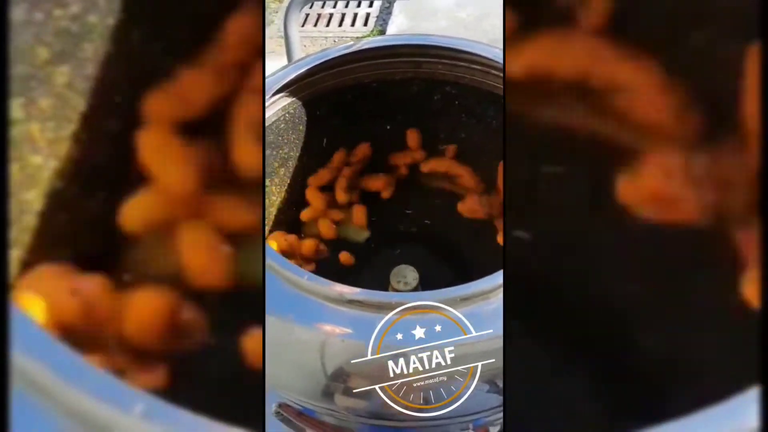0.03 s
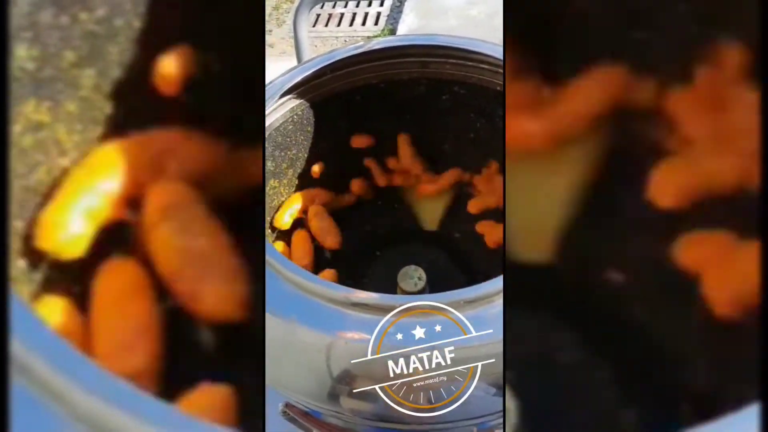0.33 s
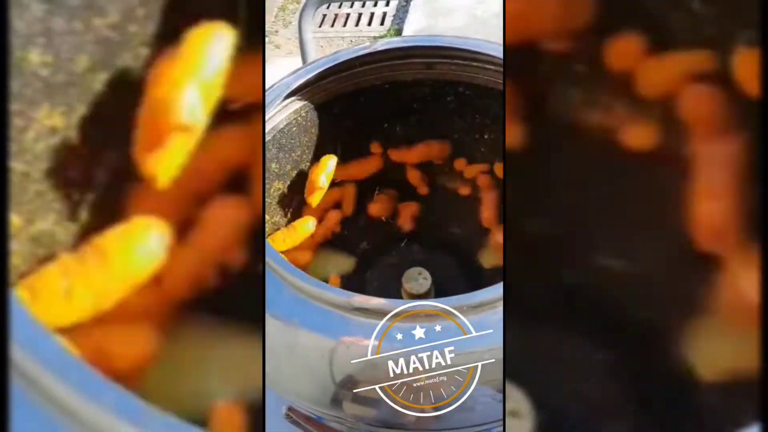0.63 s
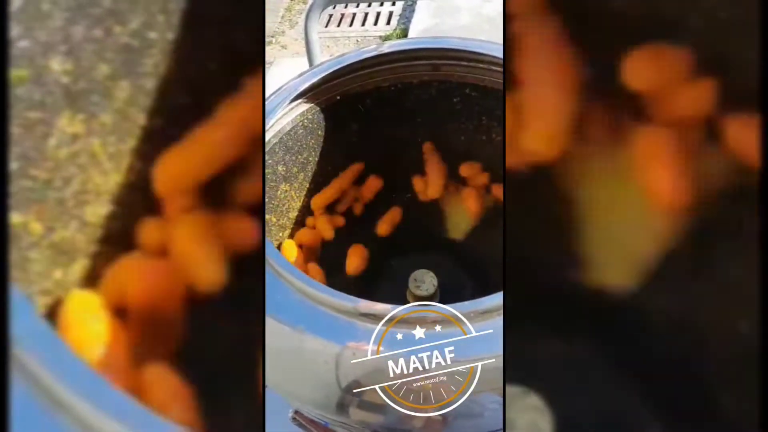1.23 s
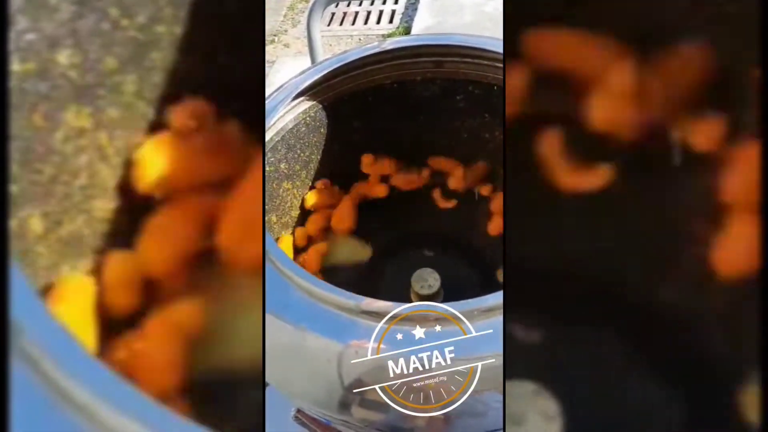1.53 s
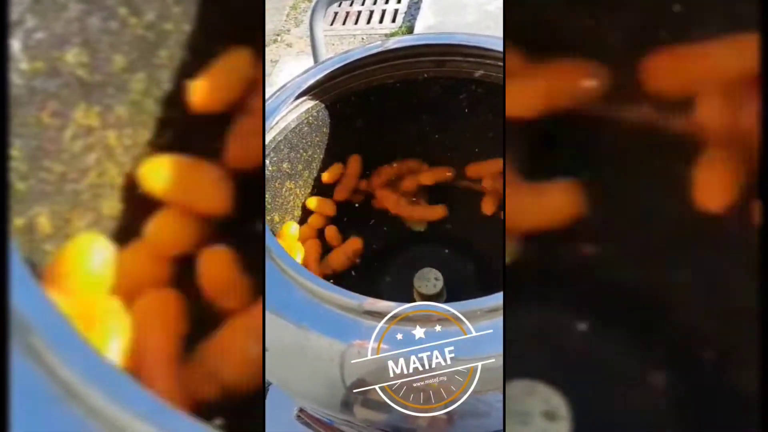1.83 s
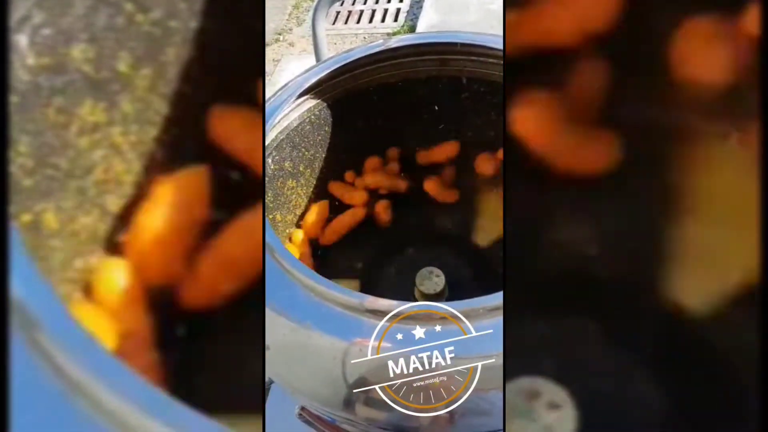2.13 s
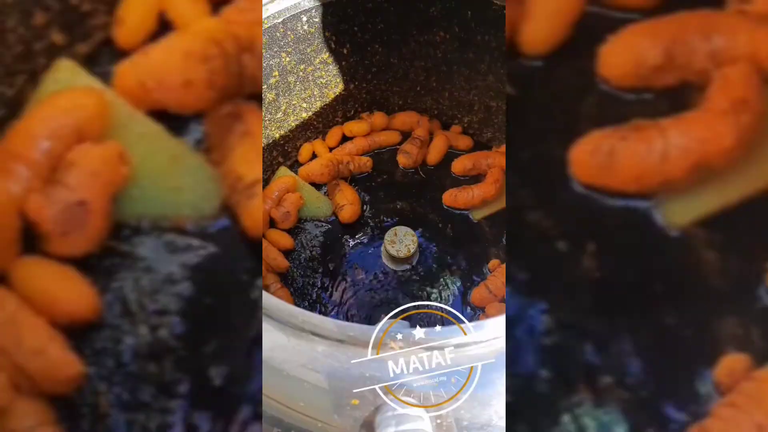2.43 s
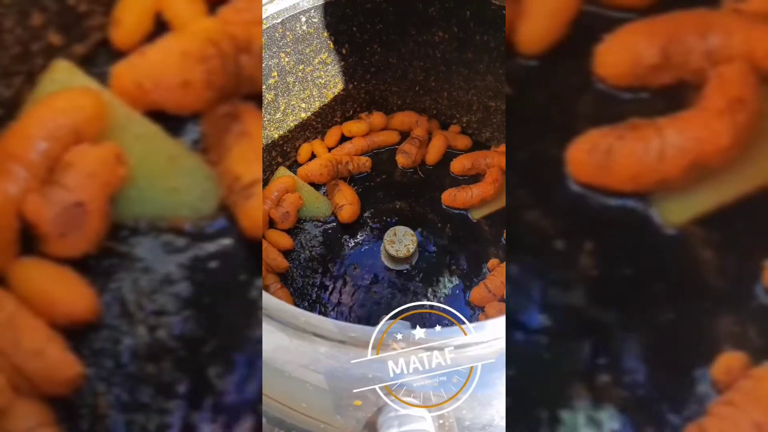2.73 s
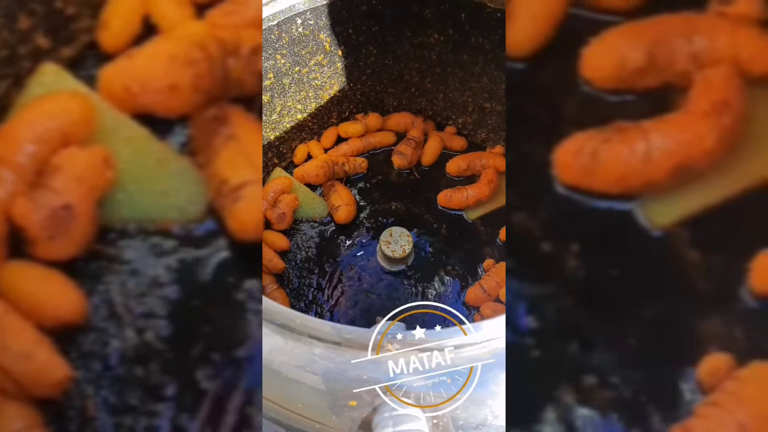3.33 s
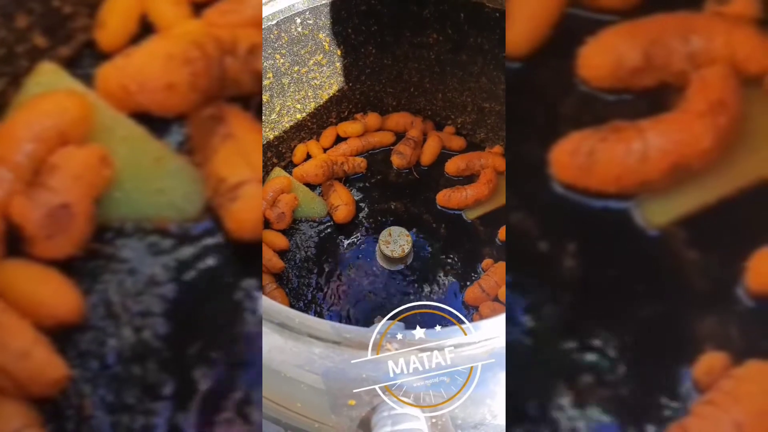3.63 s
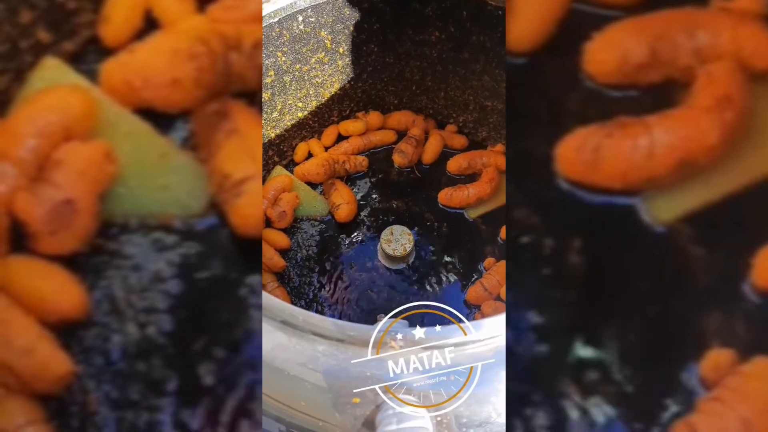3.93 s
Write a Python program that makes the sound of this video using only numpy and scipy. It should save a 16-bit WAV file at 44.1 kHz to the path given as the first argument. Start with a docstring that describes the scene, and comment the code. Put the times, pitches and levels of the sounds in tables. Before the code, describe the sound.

Throbbing rumble of roots thumping in a steel drum cuts off; water drips faintly.

```python
"""A low, throbbing din of thumps, hollow knocks and wet rasping: roots tumble in an abrasive peeler. The ribs
of its motor-driven disc heave the load, and the impacts excite the steel drum's resonant modes. The roots also
knock against each other and scrape on the grit lining, with reflections inside the drum. The scene changes
abruptly, with a click. The drum rings out, water ticks and drips as ringing bubbles, and one root settles, over
a low outdoor rumble and a faint hiss."""
import sys
import numpy as np
from scipy import signal
from scipy.fft import rfft, irfft
from scipy.io import wavfile
from scipy.ndimage import uniform_filter1d

SR = 44100
rng = np.random.default_rng(int(sys.argv[2]) if len(sys.argv) > 2 else 0)


def int16_out(signal):
    """Quantize to a 16-bit WAV file."""
    q = np.round(np.clip(np.atleast_2d(signal).T, -1, 1) * 32767)
    wavfile.write(sys.argv[1], SR, q.astype(np.int16))


N = 176400
STOP_S, CUTOFF_HZ = 2.466, 15850
THROB_BELOW_HZ, KNOCK_ABOVE_HZ = 250, 500   # the drum's modes between these carry the thumps
CENTRED = [(1, 0)]   # equal balance at all frequencies


def from_db(db):
    """Amplitude ratio of a level in decibels."""
    return 10 ** (np.asarray(db) / 20)


def unit_rms(x):
    """Normalisation to unit mean power."""
    return x / np.sqrt(np.mean(x ** 2) + 1e-20)


def times():
    """Sample times in seconds."""
    return np.arange(N) / SR


def white():
    """Two uncorrelated white noises."""
    return rng.standard_normal((2, N))


def level(rows):
    """Gain along a curve that is linear in decibels."""
    return from_db(np.interp(times(), *np.transpose(rows)))


def at_hz(points, hz):
    """Interpolation on a log-frequency axis."""
    known_hz, values = np.transpose(points)
    return np.interp(np.log(hz), np.log(known_hz), values)


def pan(balance_db):
    """Level difference between channels: balance is left minus right."""
    return from_db(np.array([[balance_db], [-balance_db]]) / 2)


def resonate(x, hz, width_hz):
    """A damped oscillator as a two-pole filter."""
    r = np.exp(-np.pi * width_hz / SR)
    return signal.lfilter([1, 0, -1], [1, -2 * r * np.cos(2 * np.pi * hz / SR), r * r], x + 1e-18)


def burst(start_s, decay_s):
    """Exponential decay from a sudden onset."""
    age = times() - start_s
    return (age >= 0) * np.exp(-np.maximum(age, 0) / decay_s)


def swells(events, rise_s, fall_s, bed_db, lead_s=0):
    """Incoherent addition: events rise and fall, their powers summed on a steady bed."""
    t, power = times(), from_db(bed_db) ** 2
    for peak_s, db in events:
        age = t - peak_s + lead_s
        falloff = np.minimum(np.maximum(-age / rise_s, age / fall_s), 20)
        power = power + from_db(db) ** 2 * np.exp(-2 * falloff)
    return np.sqrt(power)


def contacts(per_s, spread_db=0):
    """A Poisson process of impulses, equal in size unless given a spread."""
    sizes = from_db(spread_db * np.minimum(rng.exponential(1, N), 4))
    return sizes * (rng.random(N) < per_s / SR)


def patter(per_s, spread_db, decay_s, bed):
    """Shot-noise envelope: the energies of decaying contacts add on a steady bed."""
    energy = contacts(per_s, spread_db) ** 2 + 1e-18
    power = signal.lfilter([1], [1, -np.exp(-2 / (decay_s * SR))], energy)
    return unit_rms(np.sqrt(power / power.mean() + bed ** 2))


# Level difference between the microphones: frequency_hz, balance_db
MIC_BALANCE = [(110, -0.5), (380, 28.5), (650, -1), (950, 6.5), (2400, 1), (4400, 2), (8300, 2.5),
               (10500, 11.5), (15000, 9)]
# Likeness of their signals: frequency_hz, correlation
MIC_CORRELATION = [(100, 0.98), (400, 0.63), (900, 0.49), (1600, 0.033), (3000, -0.07), (8000, -0.065)]
def coloured(pair, spectrum, balance=MIC_BALANCE):
    """Spectral shaping, with mid-side mixing to set the stereo correlation; unit rms."""
    hz = np.maximum(np.fft.rfftfreq(N, 1 / SR), 1)
    correlation = np.clip(at_hz(MIC_CORRELATION, hz), -1, 1)
    mid, side = rfft(pair)
    signs = np.array([[1], [-1]])
    stereo = np.sqrt(1 + correlation) * mid + signs * np.sqrt(1 - correlation) * side
    gain = from_db(at_hz(spectrum, hz) + signs * at_hz(balance, hz) / 2)
    return unit_rms(irfft(stereo * gain * (hz < CUTOFF_HZ), N))


# Spectra of the outdoor rumble and the hiss: frequency_hz, relative_db
RUMBLE_SPECTRUM = [(25, -26), (48, -10.5), (86, 0), (115, -7), (168, -6.5), (193, -21), (285, -13.5),
                   (400, -20), (1140, -29.5), (3300, -39), (9500, -47)]
HISS_SPECTRUM = [(500, -5), (1500, 1.5), (4500, -4), (8300, -5), (9500, -23), (12000, -7), (15500, -10)]
# Their slow drift: time_s, level_db
RUMBLE_LEVEL = [(2.5, -40.5), (2.74, -42), (2.9, -39.5), (3.07, -39), (3.22, -41), (3.52, -37.5),
                (3.79, -40), (3.91, -37), (4, -41)]
HISS_LEVEL = [(2.5, -57.5), (2.8, -58), (3.6, -56), (3.85, -51), (4, -57.5)]
def background():
    """Ambient noise: a low outdoor rumble and a faint hiss, slowly modulated in amplitude."""
    rumble = level(RUMBLE_LEVEL) * coloured(white(), RUMBLE_SPECTRUM, CENTRED)
    return rumble + level(HISS_LEVEL) * coloured(white(), HISS_SPECTRUM, CENTRED)


# Spectrum of the bright noise: frequency_hz, relative_db
BRIGHT_SPECTRUM = [(1500, 11.5), (3000, 3.5), (4300, 2.5), (6400, -3.5), (8300, -0.5), (9500, -9.5),
                   (11500, -5), (13500, -4), (15500, -5)]
def bright_noise(pair, balance=MIC_BALANCE):
    """A bright, broad spectrum shared by the ticks, slaps, rasp and the click where the scene changes."""
    return coloured(pair, BRIGHT_SPECTRUM, balance)


# Water ticks: start_s, level_db, low_edge_hz
TICKS = [(2.5, -38.5, 5130), (2.574, -45, 11000), (2.629, -48, 12500), (2.723, -48.5, 7500),
         (2.956, -46, 11500), (3.23, -48.5, 4000), (3.267, -50, 10500), (3.54, -44, 10500)]
def water_ticks():
    """Small impacts of water make transients of high-passed noise, here toward the left."""
    noise = pan(9) * bright_noise(white(), CENTRED)
    out = 0
    for start_s, db, edge_hz in TICKS:
        tick = signal.sosfilt(signal.butter(4, edge_hz, "high", fs=SR, output="sos"), noise)
        out += from_db(db) * burst(start_s, decay_s=0.01) * unit_rms(tick)
    return out


# Drips: start_s, pitch_hz, level_db, decay_s
DRIPS = [(2.502, 5390, -45.5, 0.051), (2.545, 5030, -52, 0.079), (2.681, 5050, -47, .008),
         (2.925, 2280, -39, .008), (3.188, 3900, -54, .012), (3.399, 5080, -43, 0.014),
         (3.498, 6940, -45, .01), (3.642, 1660, -45, 0.016), (3.748, 2430, -46, .015),
         (3.815, 4100, -44, .01)]
def drips():
    """Bubble resonance: each drip rings as a damped sinusoid whose pitch wavers by about 3 percent."""
    out = 0
    for start_s, hz, db, decay_s in DRIPS:
        pitch_hz = hz * (1 + 0.032 * unit_rms(uniform_filter1d(white(), size=60)))
        out += from_db(db) * burst(start_s, decay_s) * np.sin(2 * np.pi * np.cumsum(pitch_hz, axis=1) / SR)
    return out


# Spectrum of a slipping root: frequency_hz, relative_db
SETTLE_SPECTRUM = [(150, 1), (330, 16), (700, -19), (1400, 1), (2400, -2), (3500, -16), (8000, -9),
                   (15000, -21)]
def settling_root(start_s=2.924):
    """A damped impact: a root slips, with a sharp first contact and a slower decay."""
    crack = from_db(-33) * burst(start_s, decay_s=0.0024)
    body = from_db(-38.5) * burst(start_s, decay_s=0.02)
    return (crack + body) * coloured(white(), SETTLE_SPECTRUM, CENTRED)


# Resonances of the steel drum: pitch_hz, bandwidth_hz, relative_db, balance_db
DRUM_MODES = [(67, 5.9, -30.5, 5), (109.8, 13, -9, -0.5), (131.7, 16, -13.5, -1), (179, 26, -10, 5.5),
              (191.6, 14.6, -4, -1.5), (296.4, 16.6, -7, 3.5), (340.2, 18.2, -5.5, 5.5),
              (368.8, 12, -2.5, 4), (539, 17, -16.5, 0), (671.6, 24.6, -14, 1), (793, 20, -25, 8),
              (1111.7, 9, -24.5, 7), (1316, 30, -31, -4), (1542, 10, -36.5, -6)]
def drum(force, low_hz=0, high_hz=CUTOFF_HZ):
    """Modal superposition: contacts excite each mode in a band with random polarity; unit rms."""
    wander_share, right_lag_s = 0.00495, 0.00015   # rms pitch drift; delay to the right microphone
    t, hits, out = times(), force * contacts(per_s=900), 0
    for hz, width_hz, db, balance_db in DRUM_MODES:
        if low_hz <= hz < high_hz:
            ring = resonate(hits * rng.choice([-1, 1], N), hz, width_hz)
            wander = wander_share * unit_rms(uniform_filter1d(rng.standard_normal(N), size=3000))
            ring = np.interp(t + np.cumsum(wander - wander.mean()) / SR, t, ring)
            ring = resonate(ring, hz, hz * 0.39)   # steepens the skirts of the peak
            out = out + pan(balance_db) * from_db(db) * unit_rms(ring)
    left, right = out
    return unit_rms(np.array([left, np.interp(t - right_lag_s, t, right)]))


def driven_drum(force, low_hz, high_hz):
    """Forced vibration of a band of modes, its short-term power drawn toward that of the force."""
    build_up_s, clump_s, evenness = 0.011, 0.046, 0.77
    early_force = np.interp(times() + build_up_s, times(), force)   # modes take time to swell
    body = drum(early_force, low_hz, high_hz) * np.sqrt(np.mean(force ** 2))
    window = np.hanning(int(2 * clump_s * SR))
    force_power = signal.fftconvolve(force ** 2, window, "same")
    body_power = signal.fftconvolve(np.mean(body ** 2, axis=0), window, "same")
    return body * (force_power / body_power) ** (evenness / 2)


def ring_out():
    """Damping: the drum's last ringing dies away exponentially."""
    return from_db(-34.5) * burst(start_s=2.481, decay_s=0.07) * drum(1)


def stop_click():
    """A broadband transient: one short click where the scene changes."""
    return from_db(-21) * burst(STOP_S, decay_s=0.0008) * bright_noise(white())


def cavity(pair, echo_gain, t60_s=0.076):
    """Reverberation: dense short reflections between the steel walls, different at each microphone."""
    t = np.arange(int(t60_s * SR)) / SR
    echoes = white()[:, :len(t)] * from_db(-60 * t / t60_s)
    tail = signal.fftconvolve(pair, echoes / np.sqrt(np.sum(echoes ** 2) / 2), axes=1)[:, :N]
    return (pair + echo_gain * tail) / np.sqrt(1 + echo_gain ** 2)


# Wet slaps: start_s, level_db, balance_db
SLAPS = [(1.222, -47, -8), (1.424, -46, 11), (1.685, -33, -12)]
def slapping():
    """Sharp wet impacts radiate quickly decaying bursts of noise."""
    envelope = sum(from_db(db) * pan(balance_db) * burst(start_s, decay_s=0.005)
                   for start_s, db, balance_db in SLAPS)
    return envelope * bright_noise(white(), CENTRED)


# Scrapes along the lining: time_s, relative_db
SCRAPES = [(0.17, -34.5), (0.234, -36), (0.515, -35), (0.695, -35.5), (0.809, -34), (0.952, -34),
           (0.997, -34.5), (1.058, -34), (1.141, -34), (1.224, -34), (1.424, -33.5), (1.686, -40),
           (1.812, -38), (1.839, -33), (2.051, -32), (2.131, -30.5)]
def rasping():
    """Friction noise: wet roots slide on the lining, with faint clicks from single grains of grit."""
    roughness = patter(per_s=120, spread_db=-0.5, decay_s=0.013, bed=0.69)
    grit = from_db(-31) * unit_rms(white() * contacts(per_s=260))
    rasp = bright_noise(cavity(roughness * (white() + grit), echo_gain=0.65))
    force = swells(SCRAPES, rise_s=0.006, fall_s=0.015, bed_db=-38.5, lead_s=0.0037)
    return from_db(2.5) * force * rasp


# Flurries of knocks: peak_s, relative_db
KNOCKS = [(0.159, -22), (0.235, -21.5), (0.314, -26), (0.43, -22.5), (0.469, -18.5), (0.508, -20.5),
          (0.815, -23), (0.89, -16.5), (1.04, -18.5), (1.171, -18), (1.273, -27.5), (1.303, -24.5),
          (1.35, -21.5), (1.494, -24.5), (1.53, -23.5), (1.585, -26), (1.624, -23.5), (1.719, -21),
          (1.902, -28), (1.959, -23.5), (2.105, -23), (2.218, -23), (2.375, -26)]
# Their hollow spectrum: frequency_hz, relative_db
KNOCK_SPECTRUM = [(50, -38), (490, -27), (620, 6), (950, 1), (1300, -13.5), (1700, -11.5), (2050, -20),
                  (2450, -16), (3200, -28), (6000, -36.5)]
def knocking():
    """Impact noise: roots strike each other and the wall, whose upper modes ring."""
    impacts = white() * patter(per_s=260, spread_db=0.5, decay_s=0.002, bed=0.34)
    force = swells(KNOCKS, rise_s=0.022, fall_s=0.022, bed_db=-27.5)
    wall = from_db(-1.5) * driven_drum(force, KNOCK_ABOVE_HZ, CUTOFF_HZ)
    roots = from_db(-1) * force * coloured(cavity(impacts, echo_gain=1), KNOCK_SPECTRUM)
    return wall + roots


def throbbing():
    """Periodic forcing: the disc's ribs heave the load, modulating the drum's lowest modes."""
    rib_rate_hz, first_rib_s = 9.75, 0.09
    mean_db, swing_db, bass_cut_hz = -18.5, 3.4, 72
    heave = np.cos(2 * np.pi * rib_rate_hz * (times() - first_rib_s))
    throb = driven_drum(from_db(mean_db + swing_db * heave), 0, THROB_BELOW_HZ)
    return signal.sosfilt(signal.butter(2, bass_cut_hz, "high", fs=SR, output="sos"), throb)


# Clumps of roots hitting the wall: peak_s, relative_db
THUMPS = [(0.098, -4.5), (0.137, -9), (0.196, -5), (0.239, -10), (0.317, -7.5), (0.433, -5), (0.484, -5),
          (0.508, -2), (0.566, -7.5), (0.649, -11), (0.725, -7), (0.805, -5.5), (0.855, -8), (0.933, -10.5),
          (0.96, -9), (1.004, -12), (1.039, -10.5), (1.059, -6.5), (1.117, -8), (1.183, -7), (1.217, -2.5),
          (1.247, -8), (1.297, -4), (1.324, -9), (1.359, -10.5), (1.412, -5.5), (1.495, -4.5), (1.526, -7),
          (1.567, -3), (1.615, -9.5), (1.655, -9), (1.714, -8), (1.761, -5.5), (1.836, -6), (1.876, -9.5),
          (1.955, -5.5), (2.003, -10), (2.057, -6), (2.115, -5.5), (2.2, -7.5), (2.263, -6), (2.335, -8.5),
          (2.362, -17), (2.389, -8)]
def thumping():
    """Impact excitation of the middle modes: roots roll along the wall and hit it in clumps."""
    force = swells(THUMPS, rise_s=0.013, fall_s=0.014, bed_db=-16)
    return from_db(-2.04) * driven_drum(force, THROB_BELOW_HZ, KNOCK_ABOVE_HZ)


def scene(stop_fade_s=0.0018):
    """Superposition of the sources: the din gives way abruptly to the sounds of the still drum."""
    running = np.clip((STOP_S - times()) / stop_fade_s, 0, 1)
    din = throbbing() + thumping() + knocking() + rasping() + slapping()
    click = stop_click()
    quiet = ring_out() + water_ticks() + drips() + settling_root() + background()
    return running * din + click + (1 - running) * quiet


def record(dry):
    """Soft saturation rounds the peaks; a steep low-pass filter removes the highest treble."""
    rounded = 1.5 * np.tanh(dry / 1.5)
    return signal.sosfilt(signal.ellip(10, .1, 80, CUTOFF_HZ, fs=SR, output="sos"), rounded)


dry = scene()
out = record(dry)
int16_out(out)
```